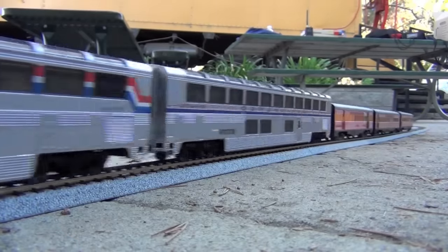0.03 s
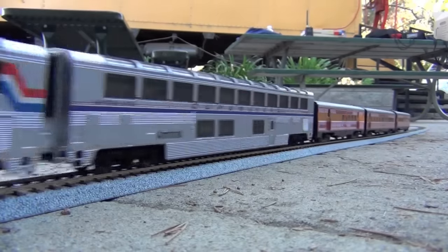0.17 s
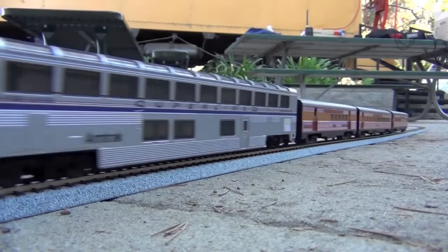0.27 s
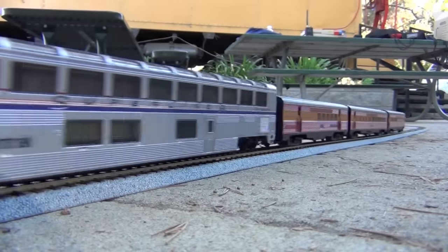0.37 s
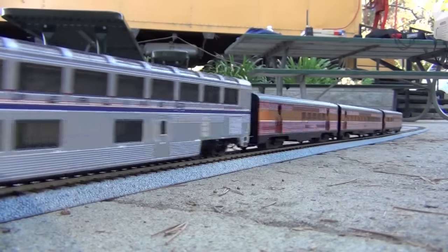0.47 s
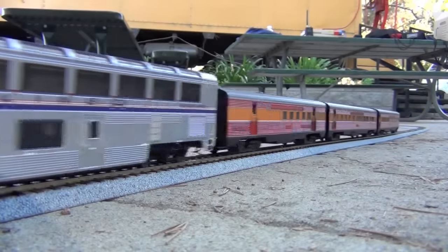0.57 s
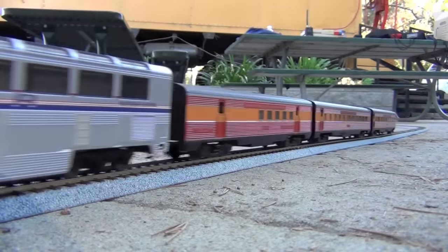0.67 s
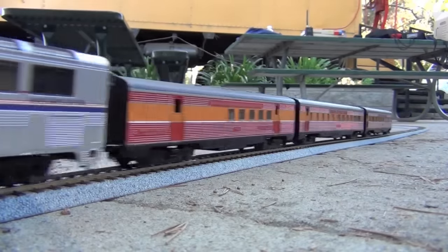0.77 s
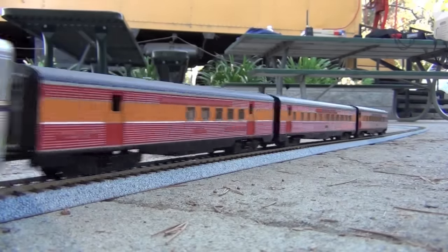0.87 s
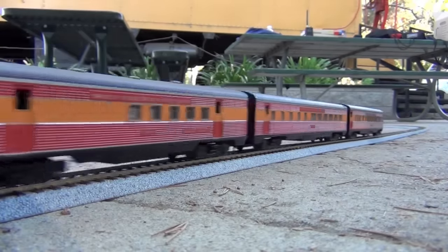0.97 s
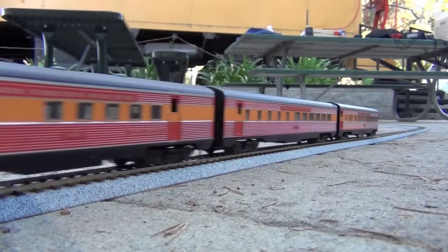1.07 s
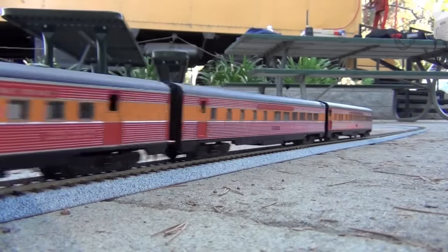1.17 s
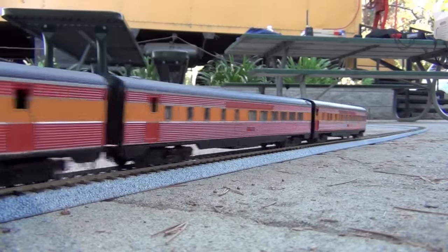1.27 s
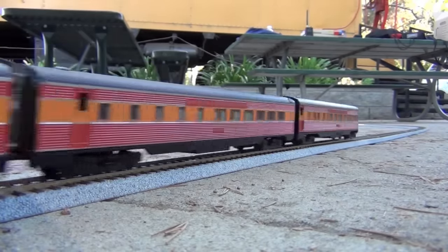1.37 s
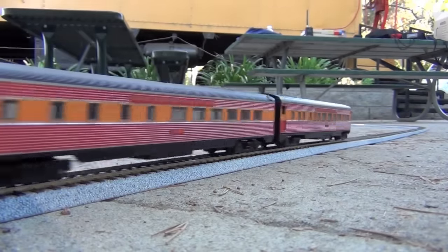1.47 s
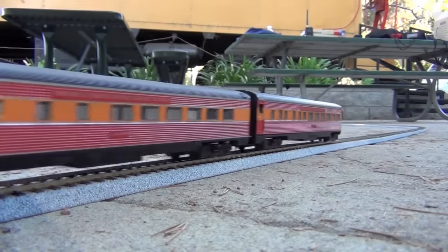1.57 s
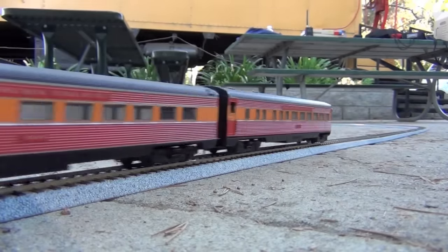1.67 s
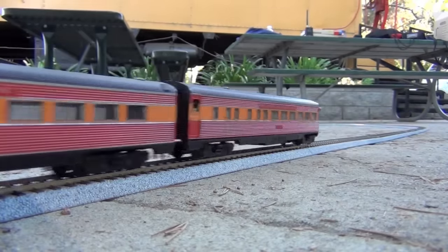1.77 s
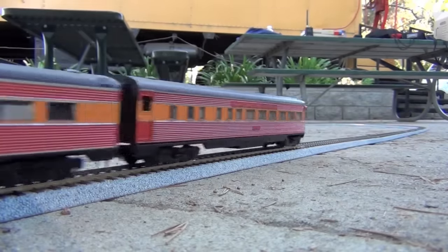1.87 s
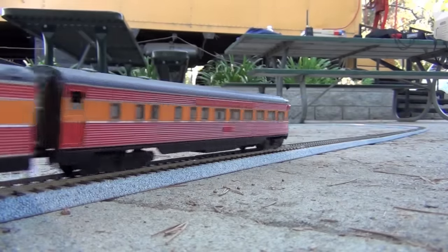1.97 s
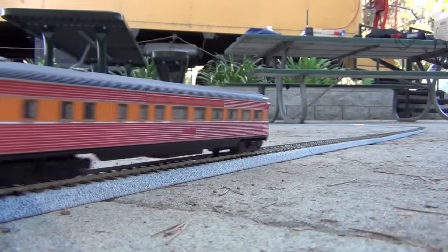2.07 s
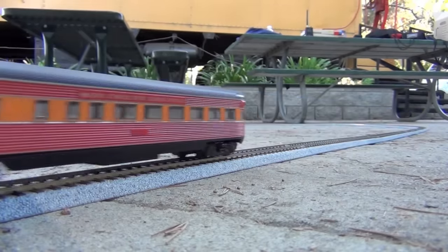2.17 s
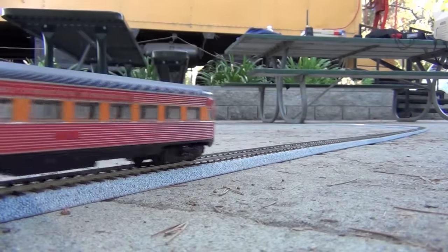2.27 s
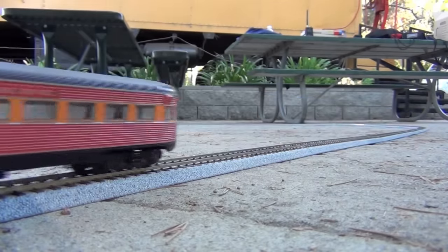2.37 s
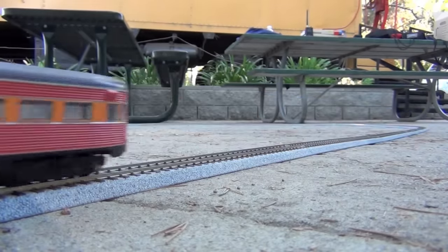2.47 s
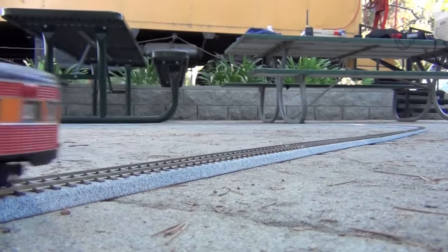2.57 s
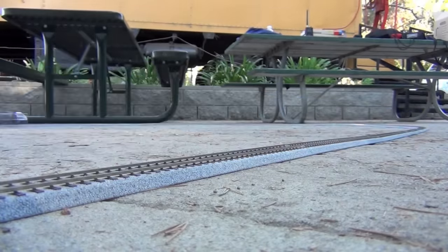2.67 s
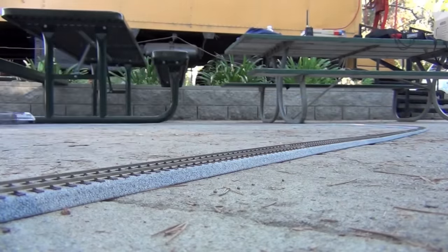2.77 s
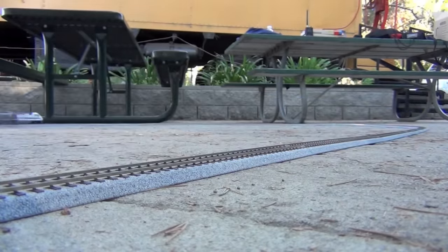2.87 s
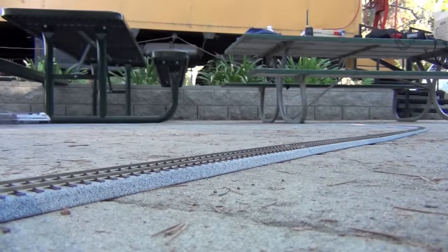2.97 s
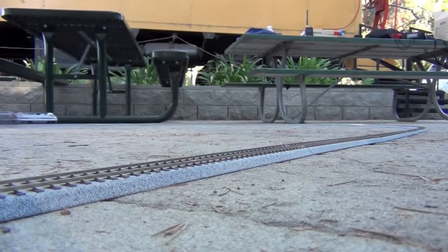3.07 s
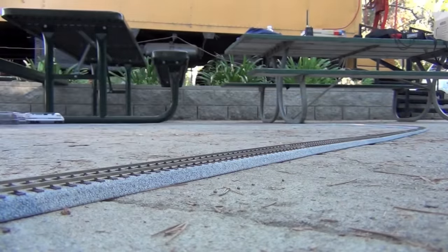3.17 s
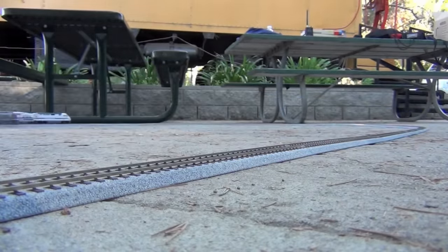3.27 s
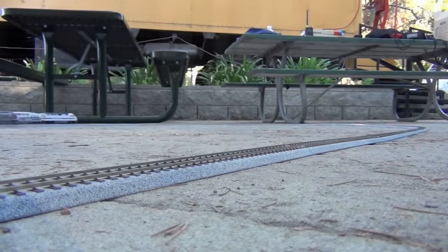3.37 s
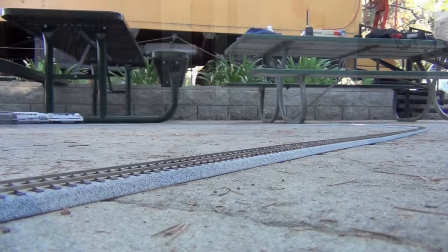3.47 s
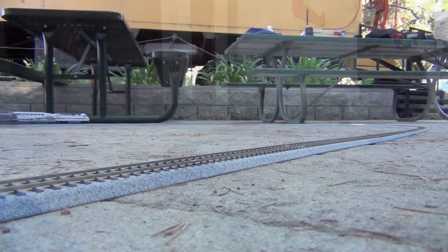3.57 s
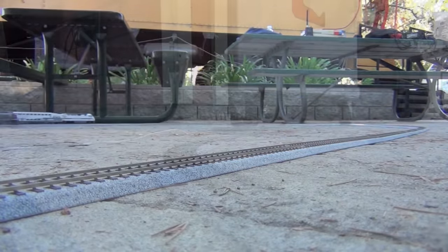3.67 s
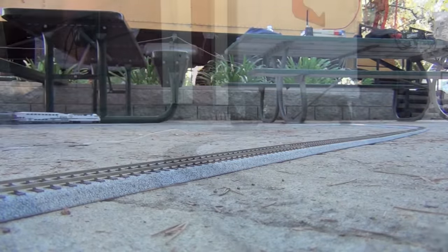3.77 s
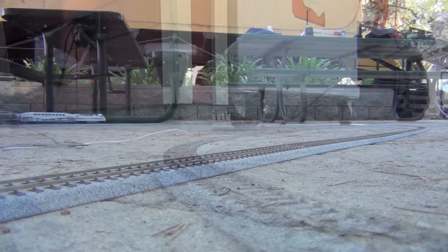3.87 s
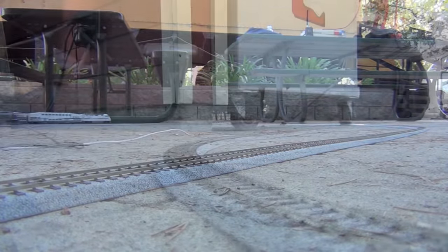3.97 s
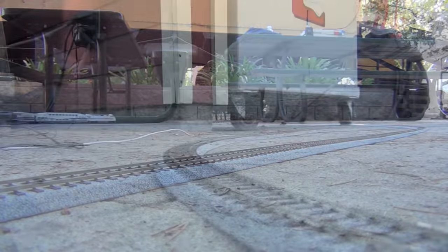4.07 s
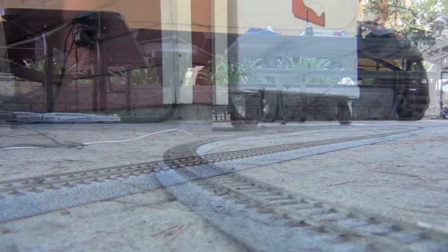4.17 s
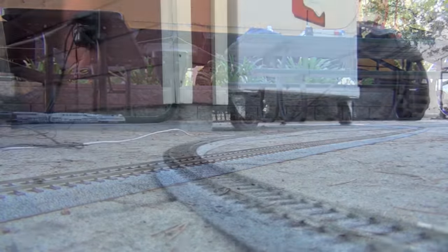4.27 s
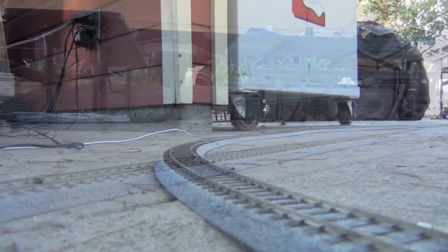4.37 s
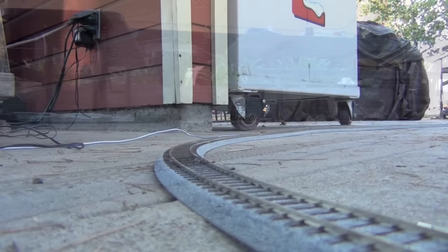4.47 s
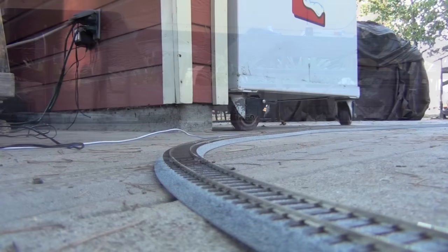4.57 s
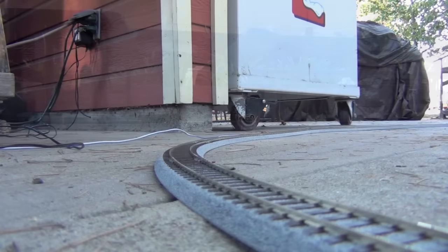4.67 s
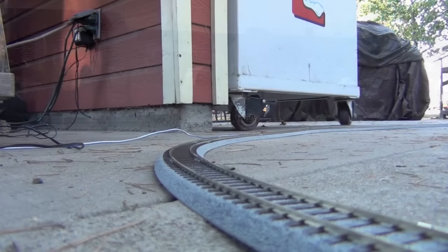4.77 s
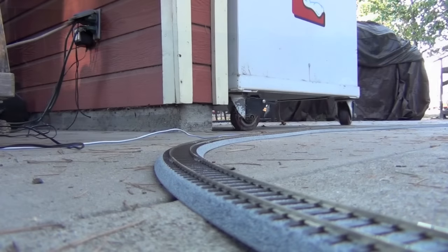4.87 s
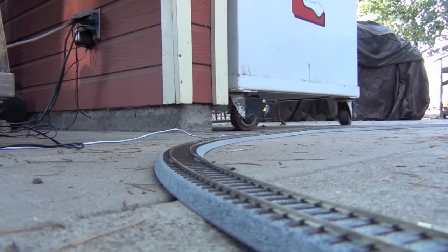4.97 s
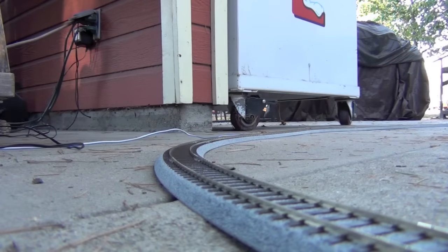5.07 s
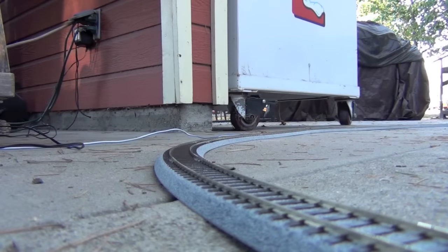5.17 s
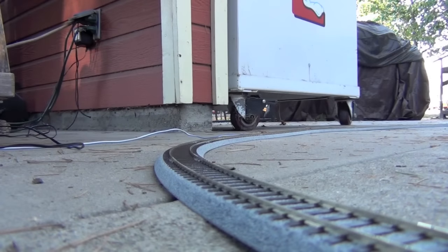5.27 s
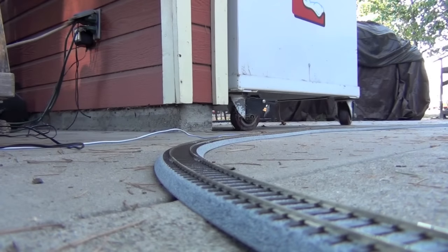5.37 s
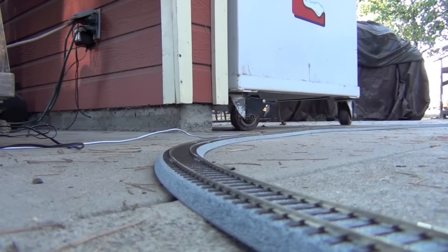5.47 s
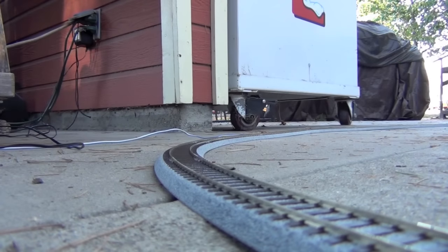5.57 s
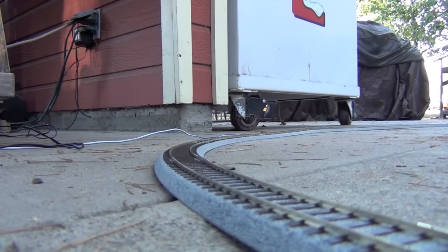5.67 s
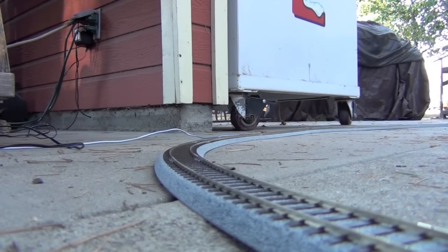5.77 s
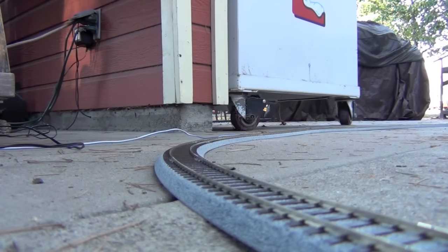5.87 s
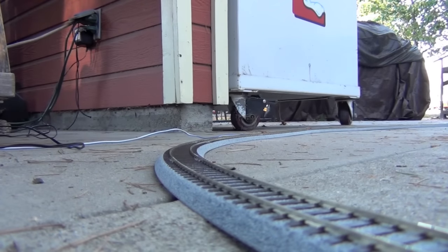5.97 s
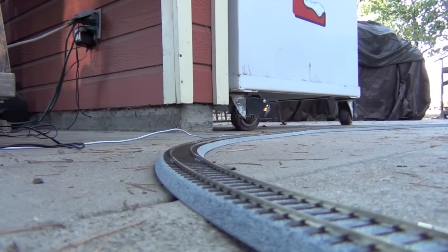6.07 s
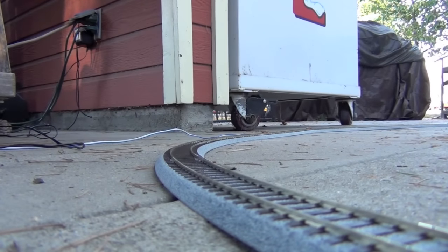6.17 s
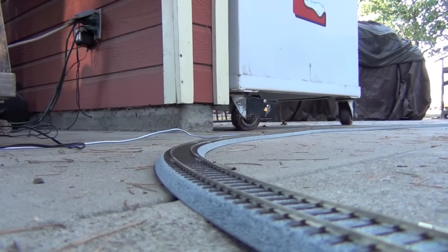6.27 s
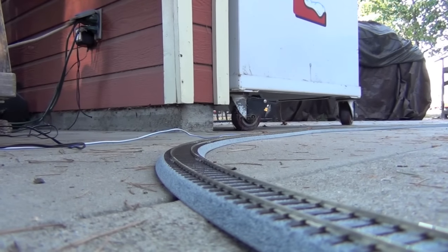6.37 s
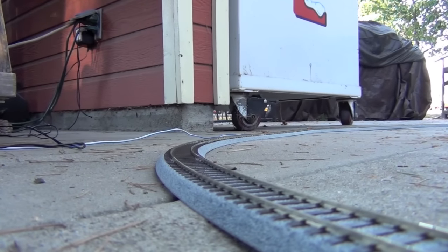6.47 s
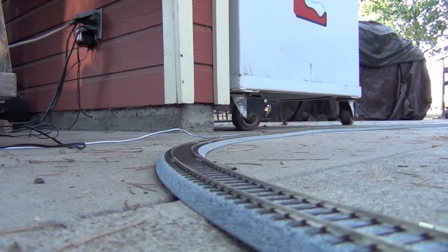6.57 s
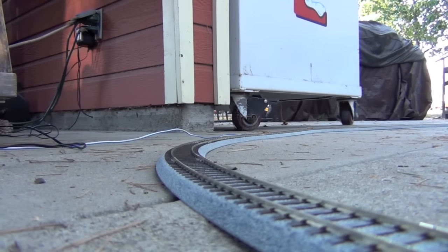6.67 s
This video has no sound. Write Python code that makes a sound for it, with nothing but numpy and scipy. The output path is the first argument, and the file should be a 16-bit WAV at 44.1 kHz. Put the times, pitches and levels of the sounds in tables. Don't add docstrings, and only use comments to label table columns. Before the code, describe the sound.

Small wheels chatter and clack over rail joints, fade out, then a distant model train makes the rails sing softly.

```python
import sys
import numpy as np
from scipy import signal
from scipy.fft import rfft, irfft, next_fast_len
from scipy.io import wavfile
from scipy.ndimage import uniform_filter1d

SR = 44100
rng = np.random.default_rng(int(sys.argv[2]) if len(sys.argv) > 2 else 0)


def linear_from_db(decibels):
    return 10 ** (np.asarray(decibels, float) / 20)


def int16_out(signal):
    q = np.round(np.clip(np.atleast_2d(signal).T, -1, 1) * 32767)
    wavfile.write(sys.argv[1], SR, q.astype(np.int16))


N = 297234
TIME = np.arange(N) / SR
SIZE = next_fast_len(N)
BIN_HZ = np.fft.rfftfreq(SIZE, 1 / SR)

# t/s, car body level/dB, left minus right/dB
LEAVING = [(0, -19.5, 4.5), (.1, -17.5, 3.5), (.5, -16, 4), (1.0, -16, 3), (1.15, -15, 3.8),
           (1.55, -16.5, 4), (1.9, -16.5, 4), (2.15, -17, 4), (2.4, -16.5, 4), (2.85, -19.5, 6),
           (3.0, -22.5, 7.5), (3.15, -27, 7.5), (3.3, -31.5, 6), (3.9, -34, 6)]


def on_log(hz, table):
    f, v = np.transpose(table)
    return np.interp(np.log(np.maximum(hz, 1)), np.log(f), v)


def columns(table):
    s, *cols = np.transpose(table)
    return [np.interp(TIME, s, c) for c in cols]


def ramp(start_s, length_s):
    return np.clip((TIME - start_s) / length_s, 0, 1)


def tint(x, table):
    return irfft(rfft(x, SIZE) * linear_from_db(on_log(BIN_HZ, table)), SIZE)[:N]


def colour(x, table, lo_hz, hi_hz):
    spec = rfft(x, SIZE) * linear_from_db(on_log(BIN_HZ, table))
    inside = np.sum(abs(spec[(BIN_HZ > lo_hz) & (BIN_HZ < hi_hz)]) ** 2)
    return irfft(spec, SIZE)[:N] * np.sqrt(N * SIZE / inside / 2)


def walk(rate_per_s):
    knots = np.convolve(rng.standard_normal(1000), [.5, .7, .5], "same")
    return 1.1 * np.interp(TIME * 2 * rate_per_s, np.arange(1000), knots)


def flicker(rate_per_s):
    w = walk(rate_per_s)
    return w - uniform_filter1d(w, SR // 7)


def shape(x, gain_db):
    bands_hz = 300 * 2 ** np.arange(0, 6.1, .5)
    spec = rfft(x, SIZE)
    place = np.interp(np.log(BIN_HZ + 1), np.log(bands_hz), np.arange(len(bands_hz)))
    out = 0
    for k, hz in enumerate(bands_hz):
        band = irfft(spec * np.clip(1 - abs(place - k), 0, 1), SIZE)[:N]
        out = out + band * linear_from_db(gain_db(hz))
    return out


def blend(hz, centres_hz, curves_db):
    place = np.interp(np.log(hz), np.log(centres_hz), np.arange(len(curves_db)))
    return sum((1 - abs(place - k)) * c for k, c in enumerate(curves_db) if abs(place - k) < 1)


def chatter(per_s, spread_db, smooth):
    sizes = (rng.random(N) < per_s / SR) * linear_from_db(spread_db * rng.exponential(size=N))
    scrape = np.convolve(sizes, np.exp(-np.arange(120) / 13.0))[:N]
    return (scrape / scrape.std() + smooth) * rng.standard_normal(N)


def ring(hz, t60_s, size=1500):
    t = np.arange(size) / SR
    return np.sin(2 * np.pi * hz * t) * np.exp(-np.log(1000) * t / t60_s)


def add(out, s, sound):
    i = int(s * SR)
    out[i:i + len(sound)] += sound[:N - i]


def scramble(x):
    spec = signal.stft(x, nperseg=512)[2]
    phase = np.exp(2j * np.pi * rng.random(spec.shape))
    return 1.4 * signal.istft(spec * phase, nperseg=512)[1][:N]


def traffic():
    # f/Hz, level/dB per Hz
    road_spectrum = [(15, -58), (25, -31), (50, -21), (90, -12), (188, -6.5), (410, -9), (895, 0.5),
                     (1530, -7.5), (1800, -5.5), (3930, -14), (4870, -17.5), (5880, -19), (6550, -19),
                     (8810, -31), (12500, -36.5), (14300, -42), (15500, -46)]
    rumble_db = -42
    roar_db = 2 * ramp(4.3, 0.63)
    treble_db = .3 + 0.1 * ramp(3.3, 0.77) - 1.8 * ramp(3.65, 0.71) + 0.68 * ramp(4.4, 0.57)
    levels_db = [0, 0.7 + 0.85 * roar_db, roar_db - 0.9, roar_db - .3, treble_db]

    def gain_db(hz):
        return blend(hz, [276, 474, 834, 1200, 1700], levels_db) + 1.1 * walk(5.) + 1.5 * flicker(12.)
    sound = colour(rng.standard_normal(N), road_spectrum, 144, 461)
    return shape(sound, gain_db) * linear_from_db(rumble_db)


def hum():
    # t/s, f/Hz, level/dB
    hum_line = [(0, 120, -71), (.45, 120, -54), (.6, 120, -48), (.85, 119, -61), (1.05, 118, -51),
                (1.5, 117, -49), (1.8, 116.5, -44), (2.7, 116, -43.5), (3.0, 116, -49), (3.2, 117, -52),
                (3.6, 117, -66)]
    hz, db = columns(hum_line)
    return np.sqrt(2) * linear_from_db(db + 0.8 + 0.37 * walk(5.1)) * np.sin(2 * np.pi * np.cumsum(hz) / SR)


def thumps():
    # t/s, peak level/dB, f/Hz, length/s
    bumps = [
        (6.275, -31, 184, 0.045),
        (6.295, -29, 206, 0.055),
        (6.323, -31, 225, 0.045),
        (6.282, -31, 327, 0.042),
        (6.294, -30, 434, 0.07),
        (6.316, -38, 603, .04),
        (6.347, -27.5, 712, 0.035),
        (6.605, -35, 202, 0.047),
        (6.66, -36.5, 164, 0.046),
    ]
    out = np.zeros(N)
    for s, db, hz, length_s in bumps:
        t = np.arange(int(length_s * SR)) / SR
        wobble = uniform_filter1d(rng.standard_normal(9000), 300)[:len(t)]
        tone = np.sin(2 * np.pi * np.cumsum(hz * (1 + 1.2 * wobble)) / SR)
        add(out, s, linear_from_db(db) * np.sin(np.pi * t / length_s) * tone)
    return out


def coming():
    # t/s, rail level/dB
    nearness = [(4.3, -31.5), (4.74, -36), (5.3, -34.5), (5.8, -34.5), (6.37, -32), (6.74, -30.5)]
    # f/Hz, level/dB per Hz
    rail_spectrum = [(760, -33), (1300, -6), (1620, -1), (1870, -5), (2370, -6), (2740, -5), (5010, -2.5),
                     (5790, -5), (6620, -6.5), (7420, -9.5), (8950, -25.5), (11000, -20.5), (15500, -31)]
    # f/Hz, width/Hz, level/dB (level unused)
    rail_modes = [(4870, 230, 0), (6460, 390, -4), (7400, 220, -7), (9740, 220, -19), (10600, 92, -19)]
    rail_db = columns(nearness)[0]
    hiss_db = rail_db - 17
    sound = colour(chatter(per_s=250.0, spread_db=3.5, smooth=5.2), rail_spectrum, 3600, 8000)
    for hz, width_hz, _ in rail_modes:
        b, a = signal.iirpeak(hz, hz / width_hz, fs=SR)
        sound = sound + 0.53 * signal.lfilter(b, a, sound)
    rattle = flicker(50.)
    early_db = 3.3 * (1 - ramp(5.25, 0.65))
    levels_db = [rail_db - 0.5, rail_db - 4.0 - early_db, hiss_db + 13.5 - 1.4 * early_db]

    def gain_db(hz):
        shake_db = min(hz / 8700.0, 1) * (0.78 * rattle + 1.0 * flicker(35.))
        return blend(hz, [2500, 6000, 10000], levels_db) + shake_db
    return shape(sound, gain_db) * ramp(3.9, 0.94)


def grit():
    # f/Hz, level/dB
    grit_spectrum = [(1200, -23), (2500, 2), (5000, 0), (8000, -8), (12000, -11), (15500, -16)]
    per_s, level_db, spread_db = 60., -15, 3.5
    sizes = (rng.random(N) < per_s / SR) * linear_from_db(spread_db * np.minimum(rng.exponential(size=N), 2.5))
    ticks = np.convolve(sizes, np.exp(-np.arange(150) / 22.5))[:N] * rng.standard_normal(N)
    near = linear_from_db(columns(LEAVING)[0] + level_db + 19)
    return tint(ticks * near * (1 - ramp(3.7, 1.2)), grit_spectrum)


def flanges():
    # t/s, peak level/dB
    grazes = [(0.0483, -29), (0.1625, -28), (0.2309, -22), (0.2977, -21), (0.384, -18), (0.4354, -18),
              (0.5087, -14), (0.5935, -22), (0.6973, -17), (0.7871, -25), (0.8515, -25), (1.053, -24),
              (1.1159, -22), (1.3583, -25), (1.4915, -23), (1.5668, -18), (1.8776, -18), (1.9245, -22),
              (1.9584, -17), (2.0373, -17), (2.1166, -26), (2.2767, -22), (2.4773, -25), (2.8549, -24),
              (3.0225, -25), (3.1647, -31)]
    # f/Hz, level/dB
    graze_spectrum = [(6000, -30), (9000, -12), (11000, 3), (15500, -6)]
    out = np.zeros(N)
    burst = np.exp(-np.arange(300) / 74.0) - np.exp(-np.arange(300) / 20.)
    for s, db in grazes:
        add(out, s, linear_from_db(db + 3.5) * rng.standard_normal(300) * burst)
    return tint(out, graze_spectrum)


def rings():
    # t/s, f/Hz, peak level/dB, length/s
    panel_rings = [(0.075, 2660, -22, 0.075), (0.332, 3080, -25, 0.12), (0.517, 2460, -23, 0.16),
                   (0.702, 5600, -25.5, .1), (0.723, 2850, -33, 0.067), (.93, 2800, -22, 0.084),
                   (1.1, 2090, -18, 0.055), (1.28, 2500, -25, 0.07), (1.48, 3040, -26, .08),
                   (1.66, 2500, -20.5, 0.054), (1.87, 2950, -22, 0.068), (2.027, 2500, -22, 0.086),
                   (2.293, 2660, -21, 0.067), (2.412, 2190, -18.5, 0.12), (2.559, 2410, -16.5, 0.044),
                   (2.6, 3000, -20, 0.029), (2.726, 2300, -27, .06), (2.868, 2450, -25, 0.032)]
    # t/s, f/Hz, peak level/dB, length/s
    rail_rings = [(0.28, 6950, -30, 0.14), (0.902, 6950, -30, 0.24), (1.3, 5740, -33, .15),
                  (2.05, 7100, -35, .1), (2.502, 6060, -32, 0.19), (2.58, 7100, -36, 0.055),
                  (2.72, 6200, -33, 0.055), (2.72, 7250, -41, .04), (2.9, 6030, -36.5, .12),
                  (3.05, 6200, -37, 0.052), (3.14, 6100, -38, 0.046), (3.3, 6160, -37, .08),
                  (3.42, 6000, -39, 0.089), (3.56, 6200, -42, .08), (3.72, 5900, -40, .05)]
    width_share = 0.17
    out = np.zeros(N)
    drive = chatter(per_s=560.0, spread_db=-1.5, smooth=1.1)
    for s, hz, db, length_s in panel_rings + rail_rings:
        b, a = signal.iirpeak(hz, 1 / width_share, fs=SR)
        i, size = max(int((s - length_s) * SR), 0), int(2 * length_s * SR)
        tone = signal.lfilter(b, a, signal.lfilter(b, a, drive[i:i + size]))
        add(out, i / SR, linear_from_db(db) * np.hanning(size) * tone / tone.std())
    return out


def joints():
    # t/s, peak level/dB
    near_joints = [(0.0293, -20), (0.1156, -22), (0.163, -7), (0.25, -11), (0.4374, -18), (0.6115, -18),
                   (0.647, -11), (0.723, -9), (0.786, -7), (1.2526, -18), (1.3224, -14), (1.3563, -17),
                   (1.5609, -9), (1.9245, -8.5), (1.9603, -11), (2.037, -9), (2.104, -11), (2.1505, -19),
                   (2.195, -9), (2.4578, -16), (2.5252, -13), (2.6065, -16), (2.6943, -20), (2.836, -13),
                   (2.9058, -20), (2.939, -16), (3.021, -15), (3.1106, -16), (3.3689, -26), (3.7324, -21),
                   (3.8114, -24), (3.975, -26), (4.0557, -21.5)]
    # t/s, peak level/dB
    far_joints = [(4.2622, -23), (4.5346, -23.5), (4.7241, -28), (4.7965, -23), (5.0439, -24),
                  (5.1517, -23), (5.1865, -23), (5.2385, -22.5), (5.2739, -31), (5.3527, -25),
                  (5.4694, -21), (5.5812, -22), (5.6141, -29), (5.7318, -24), (5.8231, -19.5),
                  (5.9134, -24), (5.9603, -28), (6.1848, -28), (6.3235, -22), (6.4268, -24), (6.512, -21),
                  (6.5974, -21), (6.668, -14.5), (6.7231, -25)]
    # t/s, peak level/dB, f/Hz
    body_knocks = [(0.1629, -5, 2200), (0.2143, -4, 2720), (0.2319, -4, 2680), (0.3264, -9, 2220),
                   (0.385, -8, 2160), (0.5014, 1, 2470), (0.561, -8, 2510), (0.7237, -10, 3190),
                   (1.1014, -2, 2100), (1.1224, -9, 2620), (1.1944, -12, 2340), (1.2659, -9, 2530),
                   (1.3762, -6, 2530), (1.45, -5, 2260), (1.5947, -12, 2190), (1.6426, -9, 2660),
                   (1.7049, -4, 2830), (1.9125, 3, 2470), (1.949, -6, 2450), (2.1893, -5, 2740),
                   (2.2577, -1, 2860), (2.2794, -4, 2250), (2.3094, -9, 2470), (2.3559, -4, 2590),
                   (2.4033, -4, 2580), (2.4572, -9, 2040), (2.5006, -17, 2200), (2.5594, -8, 2320),
                   (2.595, -11, 2590), (2.7094, -5, 2600), (2.792, -7, 2600), (2.9052, -2, 2250),
                   (3.023, -4.5, 2640), (3.056, -10, 2510), (3.0898, -11, 2380), (3.2108, -23, 2570),
                   (3.2894, -13, 3340), (3.5994, -20, 1940), (3.7922, -15, 2900), (3.9967, -11.5, 2140),
                   (4.2636, -16, 2600)]
    # f/Hz, level/dB
    crack_spectrum = [(800, -30), (3000, 8), (5000, 7.5), (7300, 2), (9000, -11), (12500, -12),
                      (15500, -21)]
    # f/Hz, level/dB
    far_crack_spectrum = [(2500, -25), (4000, 2), (5000, 2.5), (6500, 3.5), (7800, -10), (12500, -19),
                          (15500, -24)]
    crack_db, crack_slope, knock_db = 8, 1.54, -7
    far_crack_db, far_crack_slope, far_knock_db = -24.5, 1.4, -37
    crack, far_crack, knock = np.zeros(N), np.zeros(N), np.zeros(N)
    burst = np.exp(-np.arange(500) / 126.0) - np.exp(-np.arange(500) / 59.0)
    near_db = columns(LEAVING)[0]
    for s, db in near_joints:
        chance, near = rng.standard_normal(500), near_db[int(s * SR)]
        add(crack, s, linear_from_db(near + crack_db + crack_slope * (db - near - 6.5)) * chance * burst)
        add(knock, s, linear_from_db(near + knock_db) * ring(2900.0 * (1 + 0.12 * chance[0]), .012))
    for s, db in far_joints:
        chance = rng.standard_normal(500)
        add(far_crack, s, linear_from_db(far_crack_db + far_crack_slope * (db + 28.5)) * chance * burst)
        add(knock, s, linear_from_db(far_knock_db) * ring(2600. * (1 + .15 * chance[0]), .012))
    for s, db, hz in body_knocks:
        modes = ring(hz, 0.025) + 0.43 * ring(1.27 * hz, 0.011) + 0.29 * ring(1.7 * hz, 0.0051)
        add(knock, s, linear_from_db(db - 6.0) * modes)
    cracks = tint(crack, crack_spectrum) + tint(far_crack, far_crack_spectrum)
    return cracks + tint(knock, [(300, -42), (1200, -0.5)])


def leaving():
    # t/s, depth/dB, length/s
    lulls = [(0.21, 1.5, 0.024), (.61, 2.5, 0.036), (1.01, 4, 0.026), (1.343, 3, 0.03), (1.547, 1.5, 0.096),
             (1.692, 1.5, 0.017), (1.758, 5, 0.026), (1.85, 0, .02), (1.953, 2, 0.031), (2.152, 5, 0.06),
             (2.254, 13, 0.0085), (2.337, 2, 0.028), (2.585, 12, 0.013), (2.663, 4.5, 0.032),
             (2.767, 2.5, 0.037), (2.836, 8, 0.012), (2.94, 2, .03), (2.994, 3, 0.025), (3.096, 4, 0.041)]
    # f/Hz, level/dB per Hz
    car_spectrum = [(180, -43), (300, -27.5), (562, -19.5), (620, -24.5), (835, -10.5), (907, -15),
                    (1090, -10.5), (1440, -10), (2140, -0.5), (2520, 1.5), (3100, -2.5), (3650, -7),
                    (4140, -11), (5700, -11.5), (7250, -15), (7700, -19), (9930, -26.5), (11700, -26),
                    (15500, -36.5)]
    # t/s, f/Hz
    loud_panels = [(0.0, 2680), (0.82, 2480), (0.88, 2750), (1.02, 2380), (2.31, 2500), (2.45, 2460),
                   (2.63, 2660), (2.67, 2230), (3.2, 2710)]
    panel_rest_hz, panel_tilt_db = 2500, 18
    last_car_s, hidden_s = 2.56, 3.18

    lull_db = sum(db * np.exp(-((TIME - s) / length_s) ** 2 * 4) for s, db, length_s in lulls)
    wheel_lull_db = 0.13 * lull_db
    hidden = ramp(hidden_s, 0.05)
    turned = ramp(1.6, 1.8)
    gone = ramp(3.05, 0.26)

    body_db = columns(LEAVING)[0] - lull_db
    bed_db = -24 - 2 * TIME
    wheel_db = -21.5 - 2 * TIME - 2.5 * ramp(last_car_s, .04) - 8.5 * hidden - wheel_lull_db
    flange_db = -33.5 - 1.4 * TIME - 4.5 * hidden - 3.6 * ramp(last_car_s - .3, 0.53) - wheel_lull_db
    lean_db = panel_tilt_db * np.log(columns(loud_panels)[0] / panel_rest_hz) * (1 - gone)
    levels_db = [
        bed_db + 12.5 - 0.67 * turned - 2.4 * gone,
        body_db - lean_db + 0.5 + 0.92 * turned,
        body_db - .9 - 1.0 * gone,
        body_db + lean_db + 0.59 - 0.97 * turned + 4.9 * gone,
        wheel_db + 8.0,
        wheel_db + 8.5 - 5.9 * turned + 4.7 * gone,
        flange_db + 18.5 + 1.3 * gone]
    shake, rattle = flicker(21.73), flicker(70.)

    def gain_db(hz):
        share = min(hz / 9600.0, 1)
        parts_db = blend(hz, [900, 1700, 2400, 3400, 4800, 6800, 9600], levels_db)
        shake_db = share * (0.67 * shake + 0.61 * rattle + 0.86 * flicker(34.96)) + 0.54 * rattle
        drift_db = (1.1 - 0.85 * share) * (1 - 0.52 * gone) * walk(15.0)
        return parts_db + shake_db + drift_db
    sound = colour(chatter(per_s=900., spread_db=2.5, smooth=4.9), car_spectrum, 1560, 3860)
    return shape(sound, gain_db) * (1 - ramp(3.83, 0.92))


def scene():
    # f/Hz, separation (relative)
    ports = [(60, 0.0), (200, 0.0), (380, 0.5), (700, 1.4), (1290, 2.8), (2380, 4.0), (4400, 2.2),
             (8120, 0.5), (15000, 0.0)]
    # f/Hz, level/dB
    yard_scatter = [(150, -55), (300, -45), (480, -18), (1000, -15), (2500, -15), (4500, -15.5),
                    (8000, -13), (14000, -22)]
    away, near, ticks, far = leaving() + rings() + grit(), coming(), joints(), traffic()
    mid = away + near + ticks + far + hum() + thumps() + flanges()
    lean = np.tanh(columns(LEAVING)[-1] * np.log(10) / 40)
    late = ramp(3.9, 1.4)
    aimed = 1.25 * lean * (away + ticks * (1 - late))
    aimed = aimed - .15 * (near + ticks * late) + (.16 - .19 * late) * far
    top = max(v for _, v in ports)
    side = tint(aimed, [(hz, 20 * np.log10(v / top + 0.0032)) for hz, v in ports])
    side = side + tint(scramble(mid), yard_scatter)
    return np.array([mid + side, mid - side])


def roll_off(x):
    return signal.sosfilt(signal.butter(12, 15720, fs=SR, output="sos"), x)


def record(dry):
    gain = (1 + np.max(abs(dry / .93), axis=0) ** 6) ** (-1 / 6)
    high_pass = signal.butter(2, 38., "high", fs=SR, output="sos")
    return roll_off(signal.sosfilt(high_pass, dry * gain))


dry = scene()
out = record(dry)
int16_out(out)
```